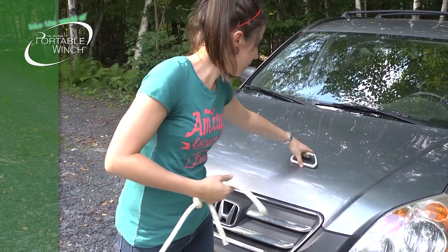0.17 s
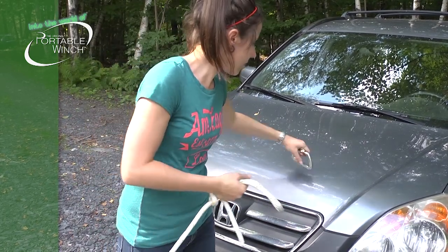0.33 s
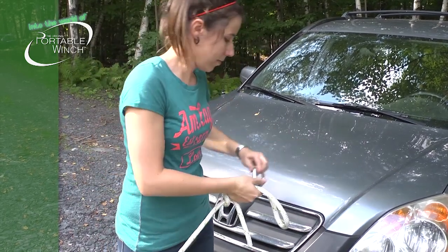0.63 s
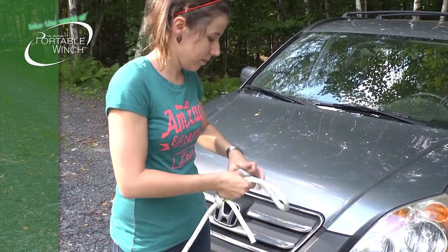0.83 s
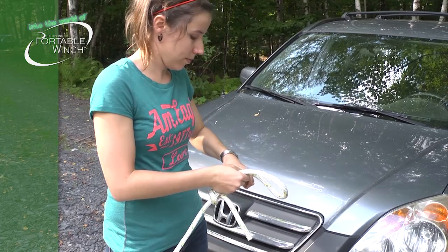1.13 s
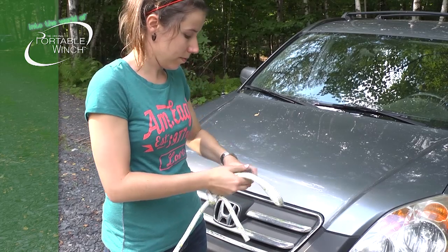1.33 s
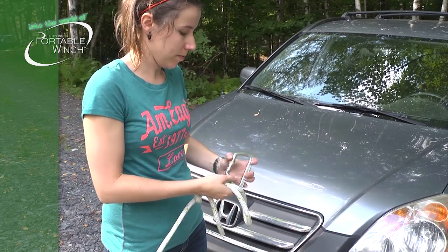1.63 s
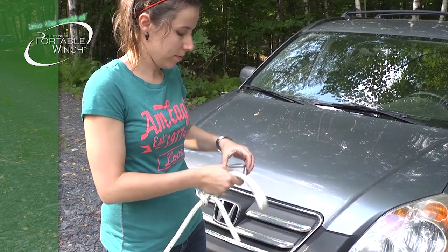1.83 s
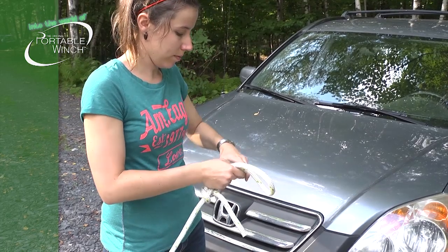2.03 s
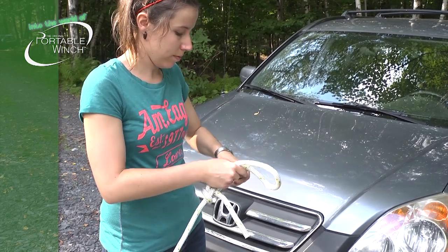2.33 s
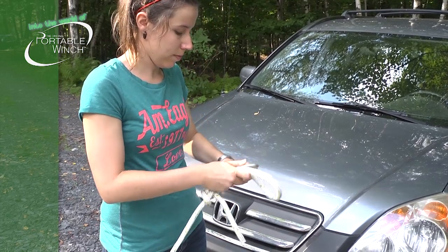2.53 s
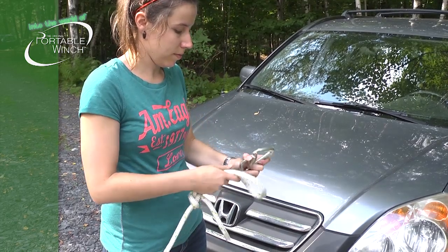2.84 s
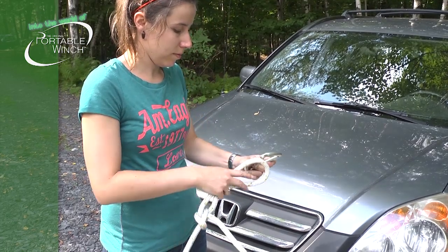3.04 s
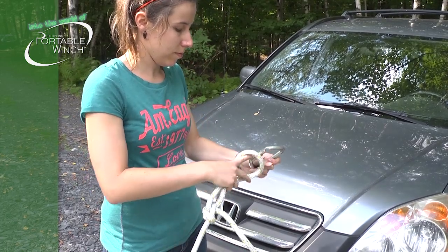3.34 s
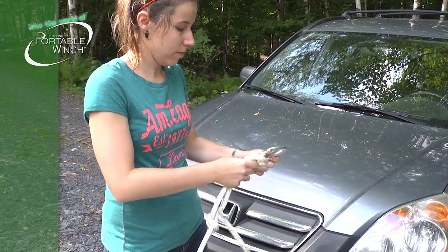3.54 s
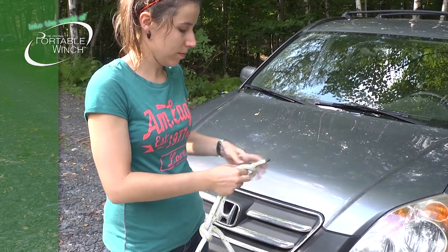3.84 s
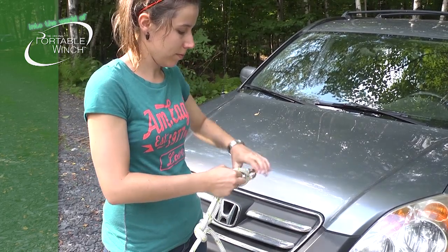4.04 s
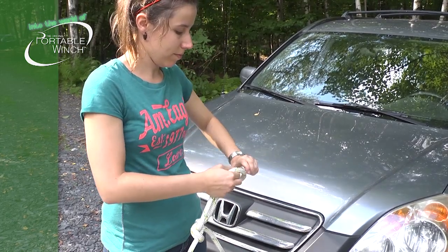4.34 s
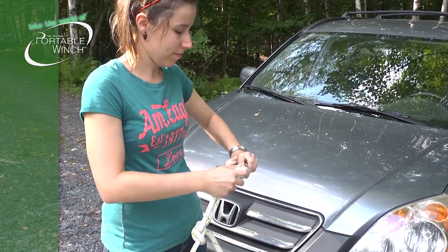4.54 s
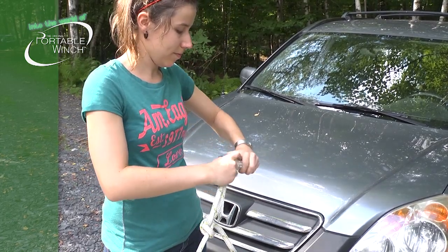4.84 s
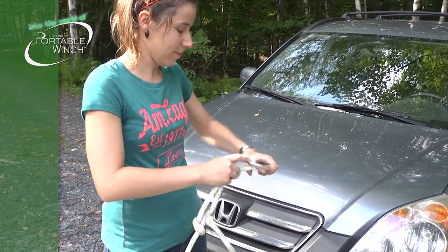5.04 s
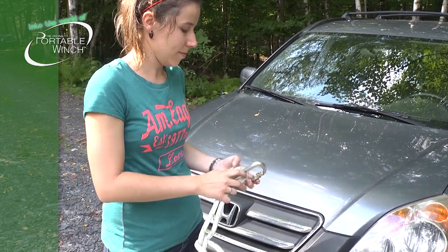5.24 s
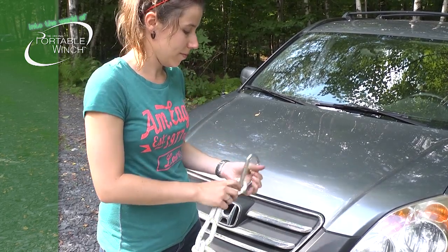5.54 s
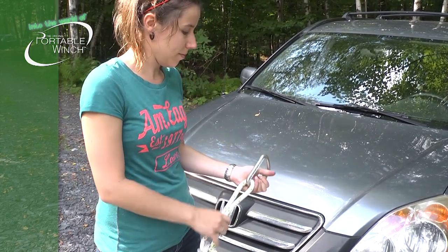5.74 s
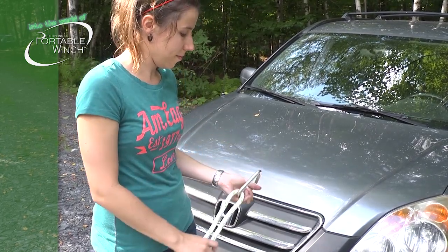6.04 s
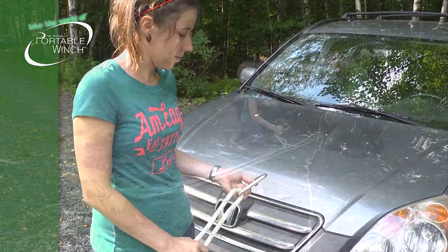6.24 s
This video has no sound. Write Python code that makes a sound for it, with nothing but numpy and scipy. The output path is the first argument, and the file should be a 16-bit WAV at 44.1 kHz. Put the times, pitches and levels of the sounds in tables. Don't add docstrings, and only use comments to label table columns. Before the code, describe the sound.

Outdoors near trees, one microphone picks up low uneven wind rumble, soft hiss with a trace of insects, and a thin steady whirr of a small motor. From about 0.1 to 0.4 seconds steel scrapes over a car bonnet in short overlapping strokes, a hollow low boom with faint scratching. Quiet handling follows. Around 1.5 seconds come dull, deep panel thumps with a wind buffet, then a faint click at 1.7. Wind swells near 2 and 2.8. At 3.3 a spring gate snaps shut, by far the loudest event: sharp, bright, ringing very briefly, with immediate echo and a faint short tail from the trees. The whirr drops out for about half a second. At 5.1 a second snap, on rope, is slightly softer and thicker. Light rope and hand rustles and a faint low knock near 5.9 end it.

```python
import sys
import numpy as np
from scipy import signal
from scipy.fft import rfft, irfft, next_fast_len
from scipy.io import wavfile

SR = 44100
rng = np.random.default_rng(int(sys.argv[2]) if len(sys.argv) > 2 else 0)


def ratio(d):
    e = np.asarray(d, float) / 20
    return 10 ** e


def persist_wave(psi):
    counts = np.round(np.clip(psi, -1, 1) * 32767).astype(np.int16)
    wavfile.write(sys.argv[1], SR, np.atleast_2d(counts).T)


N = 281269

# start in seconds, peak in dB, contact high-pass in Hz, contact low-pass in Hz, #
GATE_BLOWS = [
    (1.7001, -32, 3000, 6800, 1),
    (3.3087, -19.5, 1500, 9123, 0),
    (3.3138, 5.5, 600, 14650, 0),
    (5.128, -1, 1000, 16900, 1),
]
# frequency in Hz, width in Hz, level in dB empty, level in dB roped.
HOOK_MODES = [(800, 720, -26.5, -21.5), (1600, 300, -21.5, -6), (2080, 270, -16.5, -3.5),
              (2604, 270, -21, -4.5), (3096, 200, -3, -9), (3670, 200, -10, -8.5), (3690, 70, -5.5, 5),
              (4233, 177, 4, -3), (4384, 150, 2, -7), (4800, 400, -17.5, -2), (4820, 200, -12.5, -7),
              (5300, 110, -5, -14.5), (5690, 300, -6.5, -21), (6315, 370, -11, -8.5),
              (6890, 400, -18, -12.5), (7760, 75, -3, 0.5), (8200, 360, -22.5, -9), (9365, 160, -6.5, 1.5),
              (10250, 86, -11.5, 1), (12210, 350, -28, -24), (13670, 300, -20.5, -9),
              (15450, 210, -26, -17)]
# frequency in Hz, dB empty, dB roped.
SIDEWAYS_RADIATION = [(1600, -8, 2), (3103, -12.5, -2.5), (4250, -1.5, -1), (4800, -6, 6), (6500, 0, 5),
                      (8000, -4.5, 3), (9306, -2.5, 3), (14000, -3.5, -6.5)]
# delay in seconds, level in dB.
HARD_ECHOES = [
    (.0064, -9),
    (0.0104, -24),
]
# band centre in Hz, 60 dB decay time in seconds, level in dB.
TREE_BANDS = [(1500, .35, -37.5), (3000, .6, -42), (4364, 0.622, -34), (5700, 0.61, -31.5),
              (7300, .42, -34), (9294, .42, -33), (13000, .33, -31)]
# start in seconds, hold in seconds, panel boom in dB, scratch in dB.
STROKES = [
    (0.085, 0.019, -27.5, -46),
    (0.159, 0.091, -41, -47.5),
    (0.238, 0.079, -33, -50),
]
# frequency in Hz, width in Hz, level in dB.
PANEL_MODES = [(85, 13.5, 4.5), (124.5, 21.3, 1.5), (207, 24.4, -3.5), (355, 170, -19), (558, 49, -19)]
# frequency in Hz, width in Hz (before broadening), level in dB.
SCRATCH_MODES = [(766, 81, 4.5), (1095, 42, 8), (1365, 18, 3.5), (1800, 16, 2), (1900, 31, -3),
                 (2330, 26, -14), (3290, 53, -38), (3800, 280, -37), (4440, 37, -21), (4880, 100, -36)]
# start in seconds, peak in
# dB, pitch in Hz, 60 dB decay time in seconds.
KNOCKS = [(1.478, -33, 380, 0.093), (1.478, -44, 556, 0.077), (1.479, -27, 212, 0.037),
          (1.49, -28.5, 138, 0.23), (0.26, -35.5, 1097, 0.15), (5.879, -35.5, 125, 0.095),
          (1.483, -19, 97, .15), (1.494, -15.5, 60, 0.28), (1.573, -23.5, 110, 0.083),
          (3.238, -22.5, 65, 0.22), (3.386, -41, 890, 0.085), (1.7006, -39.5, 1820, 0.032)]
# start in seconds, peak in dB, centre in Hz, length in seconds.
TOUCHES = [(0.01, -63, 1290, 0.012), (0.24, -57, 3300, 0.013), (0.442, -61, 2200, 0.0069),
           (1.203, -58, 3800, 0.0044), (0.533, -54, 900, 0.0042), (1.477, -54, 660, 0.0046),
           (1.371, -60, 2500, 0.0033), (1.6994, -44, 4000, 0.0063), (0.097, -55, 1500, 0.014),
           (1.838, -62, 1800, .01), (2.298, -61, 2800, 0.0038), (2.611, -57.5, 2200, .006),
           (2.765, -59.5, 3200, 0.0043), (2.952, -64, 2510, .03), (3.527, -72, 2520, 0.011),
           (4.875, -64, 2806, 0.049), (4.93, -53, 1600, 0.0049), (4.998, -62, 3000, 0.045),
           (5.219, -56.5, 2300, 0.0097), (5.428, -60, 2000, 0.05), (5.616, -63.5, 2500, 0.036),
           (5.664, -61.5, 2490, 0.049), (5.812, -53.5, 1890, 0.0059), (6.335, -49, 2750, 0.0077)]
# middle in seconds, length in seconds, rumble in dB, buffet in dB.
GUSTS = [(0.087, 0.23, -44, -70), (0.44, 0.16, -65, -46), (1.526, 0.048, -56, -29.5),
         (1.652, 0.38, -39, -71), (2.025, 0.16, -31, -73), (2.756, 0.22, -35, -81),
         (3.257, 0.26, -43, -70.5), (3.7, 0.38, -41.5, -62), (5.557, .3, -44.5, -64),
         (4.796, .8, -55.5, -56), (6.1, 0.68, -70, -56)]
# multiple of the drum rate, width in Hz, level in dB.
DRIVE_TONES = [(8.98, 3.7, -5), (10.95, 3.83, 3.5), (13.06, 2.6, -10), (14.98, 1.8, -7), (27.1, 2.96, -10)]
# frequency in Hz, width in Hz, level in dB.
GEAR_MODES = [(807.7, 96.5, -4), (900, 77, 0.5), (961, 54, -0.5)]
# start in seconds, hold in seconds, loss in dB.
STALLS = [
    (3.172, 0.37, 21.5),
    (5.083, 0.05, 8.5),
]
# frequency in Hz, density in dB per Hz.
HISS_SPECTRUM = [(100, -78), (200, -86.5), (400, -89), (650, -92.5), (1100, -95), (1600, -100),
                 (3000, -103), (4600, -105), (5300, -100), (6000, -106), (10000, -107), (16000, -107)]
# frequency in Hz, density in dB per Hz.
UNEVEN_SPECTRUM = [(30, -110), (200, -110), (700, -109.5), (2000, -112), (5000, -111), (15000, -108)]


def gate(toward_trees, crack_db):
    rope_damping, scatter_blur = 1.4, (1.8, 1.8)
    hz, width_hz, *level_db = np.transpose(HOOK_MODES)
    side_hz, *side_db = np.transpose(SIDEWAYS_RADIATION)
    out = np.zeros(N)
    t = np.arange(SR // 10) / SR
    for start_s, peak_db, lo_hz, hi_hz, roped in GATE_BLOWS:
        chatter_fade_s = [0.0022, 0.004][roped]
        chatter = rng.standard_normal(len(t)) * np.exp(-t / chatter_fade_s)
        strike = (t == 0) + ratio([-25, -24][roped]) * chatter
        turned_db = np.interp(np.log(hz), np.log(side_hz), side_db[roped])
        sent_db = level_db[roped] + toward_trees * turned_db
        damped_hz = width_hz * rope_damping ** roped * scatter_blur[roped] ** toward_trees
        ring = resonate(band(strike, lo_hz, hi_hz), zip(hz, damped_hz, sent_db))
        crack = band(rng.standard_normal(len(t)) * np.exp(-t / 0.0027), lo_hz, hi_hz)
        add(out, start_s, ratio(peak_db) * (ring / np.abs(ring).max() + ratio(crack_db) * crack))
    return out


def nearby(x):
    t = np.arange(SR // 20) / SR
    gravel = rng.standard_normal(len(t)) * np.exp(-t / 0.0054)
    reply = (t == 0) + ratio(-36.5) * gravel
    for delay_s, level_db in HARD_ECHOES:
        add(reply, delay_s, ratio([level_db]))
    return signal.fftconvolve(x, reply)[:N]


def trees(x):
    reach = 1.18
    t = np.arange(int(0.8 * SR)) / SR
    tail = 0
    for hz, t60_s, level_db in TREE_BANDS:
        scatter = rms_one(band(rng.standard_normal(len(t)), hz / reach, hz * reach))
        tail = tail + scatter * ratio(level_db - 60 * t / t60_s)
    swell = 1 - np.exp(-(t / 0.028) ** 2)
    return signal.fftconvolve(x, ratio(-28.5) * tail * swell)[:N]


def bonnet():
    bite_s, boom_swell_s, boom_fade_s, scratch_fade_s = 0.013, 0.027, 0.033, 0.024
    boom = sum(ratio(db) * envelope(s, boom_swell_s, hold, boom_fade_s) for s, hold, db, _ in STROKES)
    scratch = sum(ratio(db) * envelope(s, bite_s, hold, scratch_fade_s) for s, hold, _, db in STROKES)

    slip_now = rng.random(N) < 4000 / SR
    slips = slip_now * rng.standard_normal(N) * ratio(1.9 * rng.exponential(1, N))
    broadened = [(hz, 4.1 * width_hz, db) for hz, width_hz, db in SCRATCH_MODES]
    rough = resonate(slips, broadened) + 0.25 * band(band(slips, 440, 4000), 270, 4400)
    out = boom * rms_one(resonate(slips, PANEL_MODES)) + scratch * ratio(0.5) * rms_one(rough)

    t = np.arange(SR // 2) / SR
    for start_s, peak_db, hz, t60_s in KNOCKS:
        onset = 1 - np.exp(-t * hz * 1.6)
        add(out, start_s, ratio(peak_db - 60 * t / t60_s) * np.sin(2 * np.pi * hz * t) * onset)
    return out


def handling():
    out = np.zeros(N)
    t = np.arange(SR // 5) / SR
    for start_s, peak_db, hz, length_s in TOUCHES:
        burst = rms_one(band(rng.standard_normal(len(t)), hz / 2.05, hz * 1.32))
        shape = np.minimum(t / (0.28 * length_s), 1) * np.exp(-(t / length_s) ** 2)
        add(out, start_s, ratio(peak_db + 3) * burst * shape)
    return out


def wind():
    calm_rumble_db, calm_buffet_db = -41, -51.5
    middle_s, length_s, *gust_db = np.transpose(GUSTS)
    t = np.arange(N)[:, None] / SR
    swells = np.exp(-((t - middle_s) / (length_s / 2)) ** 2)
    rumble, buffet = ratio([[calm_rumble_db], [calm_buffet_db]]) + ratio(gust_db) @ swells.T
    noise = rng.standard_normal((2, N + SR))
    deep = rms_one(band(noise[0], 18, 37)[SR:])
    light = rms_one(band(band(noise[1], 53.7, 150), 45.4, 96)[SR:])
    return rumble * deep + buffet * light


def drive():
    drum_hz, tone_db, gear_db = 29.96, -58.5, -60
    slowing_s, recovery_s = 0.066, 0.036
    loss_db = sum(db * envelope(s, slowing_s, hold, recovery_s) for s, hold, db in STALLS)
    noise = rng.standard_normal((2, N + SR))
    tones = resonate(noise[0], np.array(DRIVE_TONES) * [drum_hz, 1, 1])
    gears = band(resonate(noise[1], GEAR_MODES), 520, 1020)
    steady_tones = ratio(4) * ratio(tone_db - loss_db) * rms_one(tones[SR:])
    return steady_tones + ratio(1.5) * ratio(gear_db - loss_db) * rms_one(gears[SR:])


def hiss(spectrum):
    size = next_fast_len(N)
    hz, db = np.transpose(spectrum)
    bin_hz = np.fft.rfftfreq(size, 1 / SR)
    gain = ratio(np.interp(np.log(bin_hz + 1), np.log(hz), db))
    return np.sqrt(SR / 2) * irfft(rfft(rng.standard_normal(size)) * gain, size)[:N]


def resonate(x, modes):
    out = 0
    for k, (hz, width_hz, level_db) in enumerate(modes):
        r = np.exp(-np.pi * max(width_hz, 1) / SR)
        poles = [1, -2 * r * np.cos(2 * np.pi * hz / SR), r * r]
        mode = (1 - r) * signal.lfilter([1, 0, -1], poles, x + 1e-18)
        out = out + (-1) ** k * ratio(level_db) * mode
    return out


def band(x, lo_hz, hi_hz):
    sos = signal.butter(2, [lo_hz, min(hi_hz, 0.45 * SR)], "band", fs=SR, output="sos")
    return signal.sosfilt(sos, x)


def envelope(start_s, attack_s, hold_s, fade_s):
    t = np.arange(N) / SR - start_s
    return np.clip(t / attack_s, 0, 1) * np.exp(-np.maximum(t - attack_s - hold_s, 0) / fade_s)


def rms_one(x):
    return x / np.sqrt(np.mean(x ** 2) + 1e-30)


def add(track, start_s, sound):
    i = round(start_s * SR)
    track[i:i + len(sound)] += sound[:N - i]


def scene():
    steel = nearby(gate(False, crack_db=-12.5)) + trees(gate(True, crack_db=-16))
    mono = steel + bonnet() + handling() + wind() + drive() + hiss(HISS_SPECTRUM)
    return mono + hiss(UNEVEN_SPECTRUM) * [[1], [-1]]


def top_cut(x):
    return signal.sosfilt(signal.butter(12, 15750, fs=SR, output="sos"), x)


def record(dry):
    cutoff_hz = 15600
    overloaded = np.clip(dry, -0.99, 0.99)
    low_pass = signal.cheby2(14, 50, cutoff_hz * 1.04, fs=SR, output="sos")
    mix = signal.sosfilt(low_pass, overloaded)
    return top_cut(mix)


dry = scene()
out = record(dry)
persist_wave(out)
```